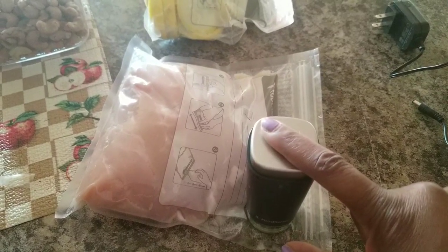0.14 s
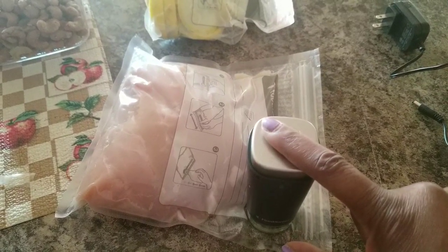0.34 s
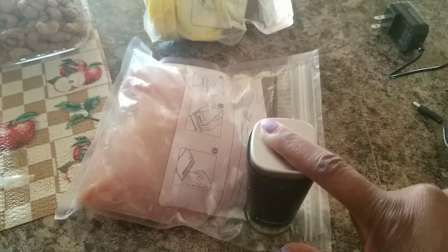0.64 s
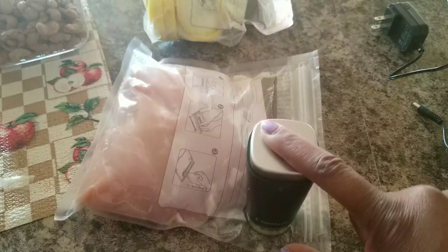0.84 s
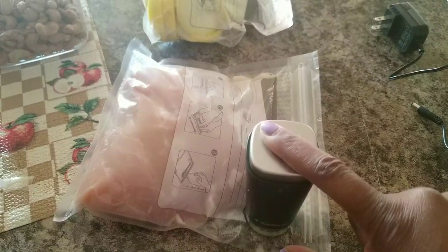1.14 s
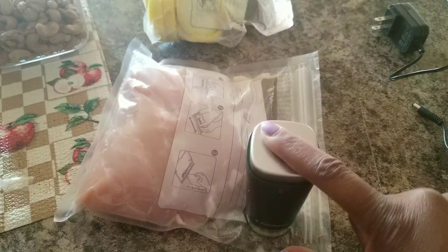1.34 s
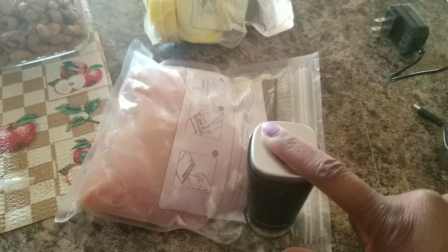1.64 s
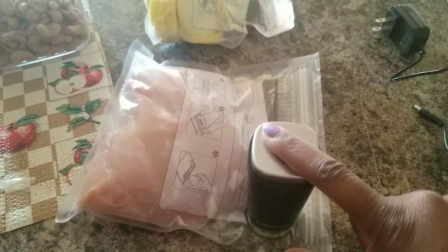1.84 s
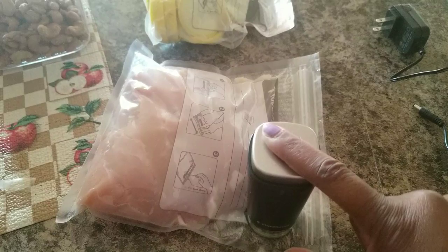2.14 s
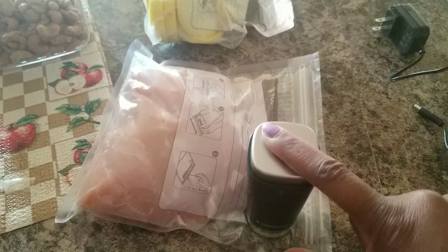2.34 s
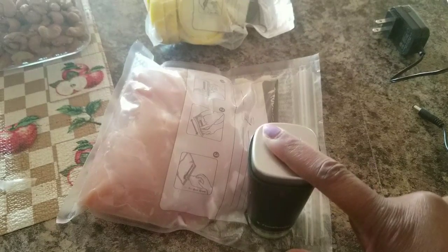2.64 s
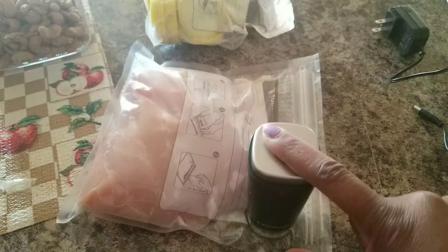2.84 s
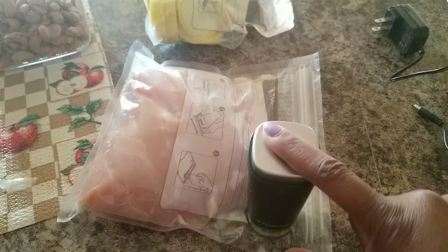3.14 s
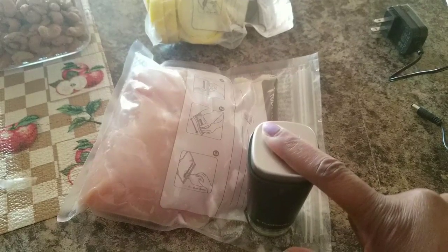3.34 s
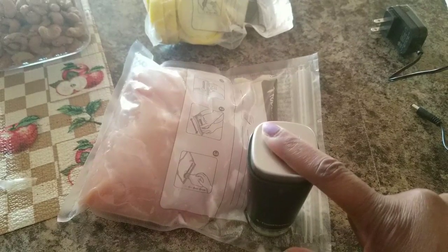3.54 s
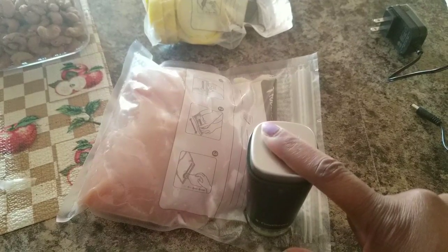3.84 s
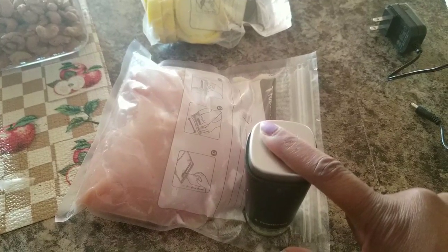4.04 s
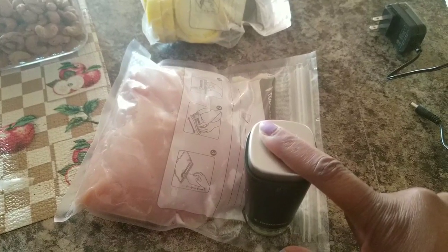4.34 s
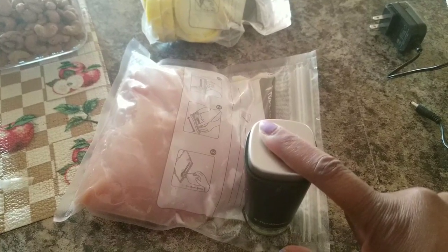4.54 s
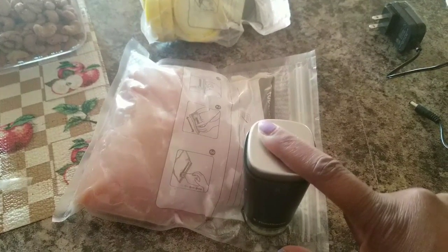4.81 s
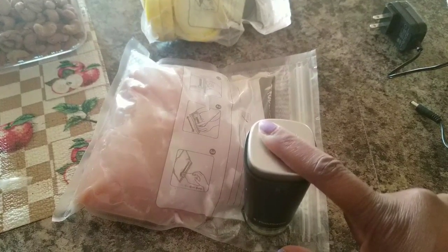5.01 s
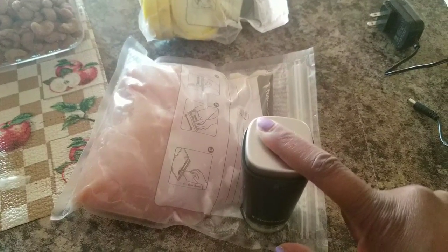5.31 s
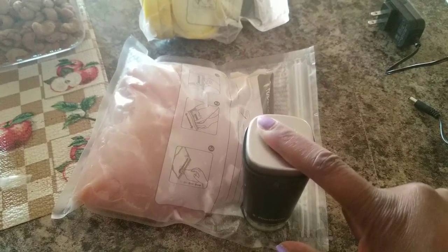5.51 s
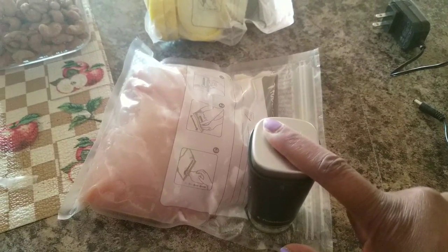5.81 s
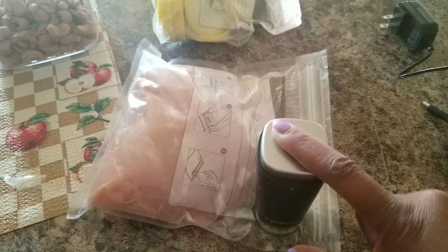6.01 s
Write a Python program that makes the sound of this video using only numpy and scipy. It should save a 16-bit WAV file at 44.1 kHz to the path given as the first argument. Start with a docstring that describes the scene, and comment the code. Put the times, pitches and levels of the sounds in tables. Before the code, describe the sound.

A small battery pump pressed on a food bag runs throughout, heard close on a phone in a kitchen. Its steady buzz near 190 Hz carries fast valve ticks, plastic rattle and a thin pulsing hiss with a very high whistle. Pitch sags slightly at first, then the tone grows a little harder midway as the vacuum builds. Soft dull knocks come irregularly, over quiet low room rumble and mains hum.

```python
"""A small three-chamber pump, pressed onto a food bag on a kitchen counter, buzzes close to a phone.
From the start, three strokes a shaft turn add up to a clean buzz, valves tick and the housing rattles;
air hisses and whistles near 13 kHz once a stroke, over room rumble and mains hum. The motor slows, mostly
in the first second. Dull knocks made of a rising tone and some noise come from 0.2 s on. Between 2.3 s
and 2.9 s the vacuum builds and shifts the buzz and ticks; a brief soft wavering tone passes near 3.5 s."""
import sys
import numpy as np
from scipy import signal
from scipy.fft import rfft, irfft, next_fast_len
from scipy.io import wavfile

SR = 44100
rng = np.random.default_rng(int(sys.argv[2]) if len(sys.argv) > 2 else 0)


def wav_out(sig):
    """Save sig, one row per channel (or a flat mono array), as 16-bit PCM at SR to the path in sys.argv[1]."""
    wavfile.write(sys.argv[1], SR, np.round(np.clip(np.atleast_2d(sig).T, -1, 1) * 32767).astype(np.int16))


N = 272097
T = np.arange(N) / SR
STROKES = 3  # per shaft turn, one for each chamber

# How fast the motor turns: time_s, shaft_rate_hz
SHAFT = [(0.0, 66.2), (0.19, 65.5), (0.5, 65.0), (0.91, 64.9), (1.1, 64.6), (2.11, 64.6), (2.85, 64.4),
         (2.94, 64.1), (3.49, 64.2), (4.05, 64.0), (4.12, 64.2), (5.07, 64.1), (5.17, 63.9), (5.36, 64.1),
         (6.14, 64.1), (6.17, 64.3)]
# How far the bag is emptied: time_s, vacuum (0 = half drawn, 1 = full)
VACUUM = [(0, 0), (2.3, 0.05), (2.85, 1), (6.17, 1)]
# Buzz, one row per shaft multiple from the first, levels at full vacuum once the load has settled:
# left_db, right_db, left_growth_db and right_growth_db (up to full vacuum), extra_db (before settling)
MULTIPLES = [(-59.5, -62.0, 0.0, 0.0, 1.0), (-80.0, -81.0, -1.0, -1.0, -4.0),
             (-43.5, -44.5, 1.0, 1.0, -0.0), (-59.0, -58.0, -1.0, 0.0, -2.0),
             (-63.5, -65.0, -4.0, -5.0, -1.0), (-45.0, -46.5, 1.0, 1.0, -1.0),
             (-83.0, -71.0, -12.0, 1.0, 5.0), (-63.5, -65.5, 3.0, 4.0, -3.0),
             (-51.5, -51.5, -2.0, -0.0, -3.0), (-62.0, -75.0, -1.0, -4.0, 1.0),
             (-67.0, -76.0, 3.0, 0.0, -2.0), (-55.5, -57.0, -2.0, -1.0, 3.0),
             (-63.5, -62.5, 3.0, -1.0, -8.0), (-69.5, -66.5, 4.0, 4.0, 8.0),
             (-58.0, -57.0, -0.0, -2.0, 6.0), (-79.5, -73.5, -1.0, 4.0, -1.0),
             (-67.5, -68.0, 4.0, 1.0, -6.0), (-68.5, -64.0, -4.0, -2.0, 1.0),
             (-76.0, -68.0, -5.0, 2.0, -14.0), (-74.0, -72.5, -3.0, -2.0, 1.0),
             (-57.0, -52.0, 1.0, 3.0, -5.0), (-76.5, -70.0, 6.0, 7.0, 10.0),
             (-72.0, -61.5, -6.0, -4.0, 5.0), (-63.0, -49.0, 2.0, 7.0, -0.0),
             (-82.5, -67.5, -3.0, 2.0, 5.0), (-69.5, -68.5, -0.0, -5.0, -2.0),
             (-70.0, -52.5, -0.0, 5.0, -1.0), (-60.5, -55.5, -2.0, 1.0, -8.0),
             (-62.5, -66.5, 5.0, -3.0, 8.0), (-57.5, -49.0, 0.0, 2.0, -7.0),
             (-59.5, -56.0, 1.0, -1.0, -11.0), (-54.5, -55.5, 4.0, 3.0, -4.0),
             (-55.0, -48.0, 8.0, 3.0, 4.0), (-61.5, -65.5, 9.0, 0.0, 8.0), (-74.0, -61.5, -3.0, 12.0, 12.0),
             (-62.0, -60.0, -1.0, -2.0, -12.0), (-67.0, -55.5, 2.0, 1.0, -8.0),
             (-65.0, -57.5, -3.0, -1.0, -10.0), (-65.5, -55.0, -4.0, -3.0, -0.0),
             (-69.0, -59.5, 6.0, -1.0, -1.0), (-71.0, -65.5, 11.0, -8.0, -14.0),
             (-74.5, -58.0, -7.0, -5.0, -9.0), (-70.5, -67.5, 4.0, -4.0, 1.0),
             (-72.0, -62.5, -1.0, 3.0, -1.0), (-70.0, -60.0, -1.0, 4.0, -2.0),
             (-74.0, -72.5, -0.0, 0.0, 2.0), (-72.0, -71.5, 2.0, -3.0, -4.0),
             (-70.0, -67.0, 4.0, -2.0, -3.0), (-76.0, -76.5, 12.0, -4.0, -14.0),
             (-78.0, -71.5, 11.0, 5.0, 0.0), (-80.5, -72.0, -6.0, -8.0, -8.0),
             (-99.5, -86.0, -9.0, -8.0, -8.0), (-84.0, -74.5, 0.0, 12.0, -4.0)]
# How far the right port trails the left in the buzz: multiple, lag_rad
PORT_LAG = [(3, 0), (9, .7), (12, -.7), (15, -.4), (18, 1.8), (21, .2), (23, -.8), (24, 1.6), (28, -.4),
            (30, 1.7), (31, 2.4), (32, 1.9), (37, 1.4), (39, 3.3), (40, .8), (41, 1.4), (42, 2.7),
            (45, 3.6), (48, 2.6), (53, 4)]
# Random phase shift, each times the multiple: whole_strokes_rad, uneven_multiples_rad, between_ports_rad
SCATTER_RAD = (.005, .008, .003)
# Multiples in which the second stroke rings most; in other high uneven ones it rings least
SECOND_RINGS = (19, 20, 22, 23, 25, 31)
# Valve plate resonances, levels at full vacuum:
# pitch_hz, width_hz (of the narrower filter), left_db, right_db, growth_db (up to full vacuum)
VALVE_PLATE = [(3500, 160, -69, -71.5, 4), (3676, 92, -74, -81, 2), (4250, 720, -71, -66.5, 2),
               (4640, 350, -68.5, -90, 2), (4825, 91, -70, -63.5, 0), (5150, 140, -75, -71, 6),
               (5456, 97, -74, -81, -4.5), (5615, 100, -64, -68.5, -3), (6000, 250, -61, -72, -2),
               (6334, 330, -65.5, -63.5, 2), (6690, 330, -64.5, -63, 0), (7015, 78, -77, -64, 4)]
# Each chamber closes with its own force: level_db, one per chamber
VALVE_DB = (0, -7, -2)
# Each chamber closes a little early or late: delay_s, one per chamber
VALVE_LATE_S = (0, -.00003, .00002)
# Air rattling in the housing, before the overall RATTLE_DB: pitch_hz, left_db_per_hz, right_db_per_hz
RATTLE = [(500, -91.5, -92.5), (800, -90.5, -90.5), (1100, -92.5, -91.5), (1600, -93, -86),
          (2000, -88, -85), (2350, -90.5, -86.5), (2750, -91, -85), (3050, -97, -94), (3400, -99, -96),
          (4200, -120, -120)]
# Air leaving the outlet: pitch_hz, left_db_per_hz, right_db_per_hz
HISS = [(3000, -110, -110), (3700, -100, -101), (4250, -96, -93), (4600, -100, -99), (5200, -99, -101),
        (5800, -95.5, -96), (6750, -95, -91), (7400, -102, -100), (8000, -94, -95), (8500, -95, -91),
        (8900, -98, -93), (9850, -91.5, -94.5), (10600, -98, -94), (10950, -89.5, -94), (11300, -93, -95),
        (12100, -96, -97), (13900, -97, -99), (14350, -95, -101), (14950, -91, -93), (15300, -96, -97)]
# Outlet whistle: pitch_hz, width_hz (of the wider filter), left_db, right_db
WHISTLE = (12886, 915, -53, -63.5)
# Room rumble: pitch_hz, left_db_per_hz, right_db_per_hz
ROOM = [(19.6, -105, -107), (40, -77.5, -99), (60, -78.5, -75), (92, -75.5, -83), (132, -89.5, -84),
        (257, -80.5, -75.5), (316, -82.5, -85.5), (360, -84.5, -90), (453, -89, -86), (684, -105, -87.5),
        (1340, -110, -110)]
# Mains hum: pitch_hz, left_db, right_db
MAINS = [(59, -68.5, -67.5), (120.4, -74, -70.5), (236, -77, -87)]
# Dull knocks, before they are placed left of centre: start_s, peak_db, starting_pitch_hz
KNOCKS = [(0.216, -40, 322), (0.351, -40, 298), (0.631, -47, 312), (1.318, -38, 320), (2.175, -39, 333),
          (3.65, -40, 310), (3.742, -47, 286), (4.411, -40, 292), (5.425, -39, 310), (6.004, -39, 318)]
# Brief soft tone, before it is placed left of centre:
# middle_s, half_length_s, middle_pitch_hz, rise_hz_per_s, level_db
BLIP = (3.545, .05, 845, 250, -59)

SETTLE_S = .4  # the load settles after the start
PULSE_RAD = 0.37  # phase of the pulse
# Low uneven multiples blunt one stroke: radians (divided by the multiple squared), upper limit
BLUNT_RAD, BLUNT_BELOW = 32., 13.5
# Middle uneven multiples trail the pulse: radians, upper limit
LATE_RAD, LATE_BELOW = 2.35, 18.5
# Above those the housing rings with its own phase, a little late
RING_RAD, RING_LATE_TURNS = 0.9, .012
PORT_LAG_S, RATTLE_DB = 0.00007, -1
KNOCK_RISE, KNOCK_T60_S = 7., .075  # pitch rise as a share per s; time to fade by 60 dB
KNOCK_THUD = .25  # level of loose thud beside the tone
TOP_HZ = 15510


def undb(db):
    """Turn a level in dB into a plain multiplier."""
    return 10 ** (np.asarray(db, float) / 20)


def unit(x):
    """Scale to an rms (average strength) of 1."""
    return x / np.sqrt(np.mean(x ** 2))


def walk(rate):
    """Wander in straight lines between random points, rate points a second, with a spread near 1.2."""
    points = rng.standard_normal(int(N / SR * 60))
    point_s = np.arange(len(points)) / rate
    return 1.49 * np.interp(T, point_s, points)


def peak(x, hz, width_hz):
    """One resonance: sound near its pitch passes, at gain 1 in the centre."""
    return signal.lfilter(*signal.iirpeak(hz, hz / width_hz, SR), x)


def port_noise(alike, lag_s, echo_s=0., echo=0.):
    """Noise at two ports: a shared part, late and with a second path at the right, plus a part of each's own."""
    shared, left, right = rng.standard_normal((3, N))
    alike = np.clip(alike, 0, 1)
    second_path = echo * np.roll(shared, round(echo_s * SR))
    late = unit(np.roll(shared, round(lag_s * SR)) + second_path)
    return np.sqrt(alike) * np.array([shared, late]) + np.sqrt(1 - alike) * np.array([left, right])


def colour(x, table):
    """Shape white noise so each pitch range has the strength listed in a table."""
    hz, *sides = np.transpose(table)
    size = next_fast_len(N)
    log_hz = np.log(np.fft.rfftfreq(size, 1 / SR) + 1)
    gain = [undb(np.interp(log_hz, np.log(hz), db)) * np.sqrt(SR / 2) for db in sides]
    return irfft(rfft(x, size) * gain, size)[:, :N]


def puff(turns, at, depth_db):
    """Level that swells once a stroke, at a given share of it; rms 1."""
    swell = np.cos(2 * np.pi * (STROKES * turns - at))
    return unit(undb(depth_db / 2 * swell))


def stroke_rad(order):
    """Phase of a shaft multiple at both ports, set by how the three strokes differ."""
    lag = np.interp(order, *np.transpose(PORT_LAG))
    uneven = order % STROKES
    if order < LATE_BELOW:
        left = PULSE_RAD
        if uneven and order < BLUNT_BELOW:
            left += BLUNT_RAD / order ** 2
        elif uneven:
            left -= LATE_RAD
        return left, left - lag
    second = (0, 1, -1)[uneven] * np.pi / STROKES + np.pi * (order in SECOND_RINGS)
    right = RING_RAD + second - 2 * np.pi * order * RING_LATE_TURNS
    return right + lag, right


def buzz(turns, vacuum):
    """Clean shaft multiples pile up into one pulse a stroke; counter and walls shift each a little."""
    out = np.zeros((2, N))
    early = np.exp(-(T / SETTLE_S) ** 2)
    for order, row in enumerate(MULTIPLES, start=True):
        scatter = rng.standard_normal(2) * order
        phase = 2 * np.pi * order * turns + SCATTER_RAD[order % STROKES > 0] * scatter[0]
        phase = phase + .07 * walk(9)
        shift = np.add(stroke_rad(order), (0, SCATTER_RAD[2] * scatter[1]))
        common_db = (.4 + 0.01 * order) * walk(14) + row[4] * early
        for side in range(2):
            db = row[side] + row[2 + side] * (vacuum - 1) + common_db
            out[side] += np.sqrt(2) * undb(db) * np.cos(phase + shift[side])
    return out


def valves(turns, vacuum):
    """A tick at each valve closing makes the plate ring at its resonances."""
    stroke = STROKES * turns - .5
    count = np.arange(1, int(stroke[-1]))
    chamber = count % STROKES
    chance = rng.standard_normal((len(count), 2))
    at = np.interp(count, stroke, np.arange(N))  # in samples
    at = at + SR * np.array(VALVE_LATE_S)[chamber] + .12 * chance[:, 0]
    size = undb(np.array(VALVE_DB)[chamber] + chance[:, 1])
    # each tick falls between samples: spread it as a windowed sinc
    taps = np.floor(at).astype(int)[:, None] + np.arange(-7, 9)
    off = taps - at[:, None]
    ticks = np.zeros(N + 32)
    np.add.at(ticks, taps, size[:, None] * np.sinc(off) * np.cos(np.pi * off / 16) ** 2)
    ports = np.array([ticks[:N], np.roll(ticks[:N], round(.0009 * SR))])  # later at the right
    out = np.zeros((2, N))
    for hz, width, *db, grow_db in VALVE_PLATE:
        ring = unit(peak(peak(ports, hz, width), hz, 2 * width))
        change = undb(grow_db * (vacuum - 1) + 1.36 * walk(6))
        out += undb(db)[:, None] * change * ring
    return out


def air(turns):
    """Housing rattle swells on the stroke; outlet hiss and whistle swell about half a stroke later."""
    rattle = colour(port_noise(0.27, PORT_LAG_S) * puff(turns, .97, 7.), RATTLE)
    rattle = rattle * undb(RATTLE_DB + .6 * walk(8))
    jet = port_noise(.6, .0009, -.0003, -.4)
    hiss = colour(jet * puff(turns, .55, 4.5) * undb(.5 * walk(40)), HISS)
    hz, width, *db = WHISTLE
    whistle_jet = port_noise(.75, .00032)
    tone = unit(peak(peak(whistle_jet, hz, width), hz, 0.68 * width))
    whistle = tone * puff(turns, .62, 10.5) * undb(.7 * walk(30)) * undb(db)[:, None]
    return rattle + hiss + whistle


def kitchen():
    """Room rumble from shaped noise, nearly the same at both ports, and mains hum from unsteady tones."""
    hum = np.zeros((2, N))
    for hz, *db in MAINS:
        tone = np.sqrt(2) * np.cos(2 * np.pi * hz * T + 0.19 * walk(2.95))
        hum += np.outer(undb(db), tone)
    rumble = colour(port_noise(1.0, .00003), ROOM) * undb(.6 * walk(4))
    return hum + rumble


def small_sounds():
    """Dull fading knocks that rise in pitch and a brief wavering tone, somewhat to the left."""
    out = np.zeros(N)
    thud = unit(peak(rng.standard_normal(N), 410, 270))
    for start_s, db, hz in KNOCKS:
        age = np.clip(T - start_s, 0, .2)
        tone = np.sin(2 * np.pi * hz * age * (1 + KNOCK_RISE * age / 2))
        knock = (tone + KNOCK_THUD * thud) * 1000. ** (-age / KNOCK_T60_S)
        knock = knock * (1 - np.exp(-age / 0.012))  # soft start
        out += undb(db) * knock / np.abs(knock).max()
    middle_s, half_s, hz, rise, db = BLIP
    since = T - middle_s
    phase = 2 * np.pi * (hz + rise * since / 2) * since + 1.1 * walk(35)
    fade = np.exp(-(since / half_s) ** 2)
    out += undb(db + 3 * walk(40)) * np.sqrt(2) * np.sin(phase) * fade
    return np.outer(undb([1.1, -1.1]), out)


def scene():
    """The pump's layers all follow one shaft; the kitchen and small sounds are added."""
    shaft_hz = np.interp(T, *np.transpose(SHAFT))
    vacuum = np.interp(T, *np.transpose(VACUUM))
    turns = np.cumsum(shaft_hz + .02 * walk(12)) / SR
    return buzz(turns, vacuum) + valves(turns, vacuum) + air(turns) + kitchen() + small_sounds()


def record(dry):
    """The phone cuts the top: a steep filter removes what lies above TOP_HZ."""
    return signal.sosfilt(signal.ellip(12, .3, 60, TOP_HZ, fs=SR, output="sos"), dry)


dry = scene()
out = record(dry)
wav_out(out)
```